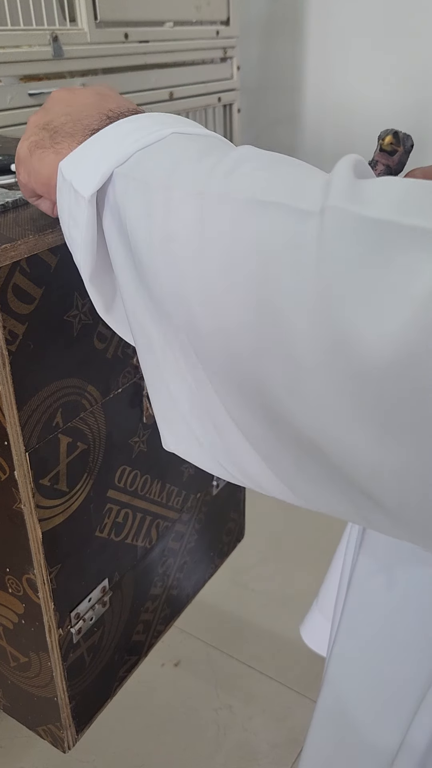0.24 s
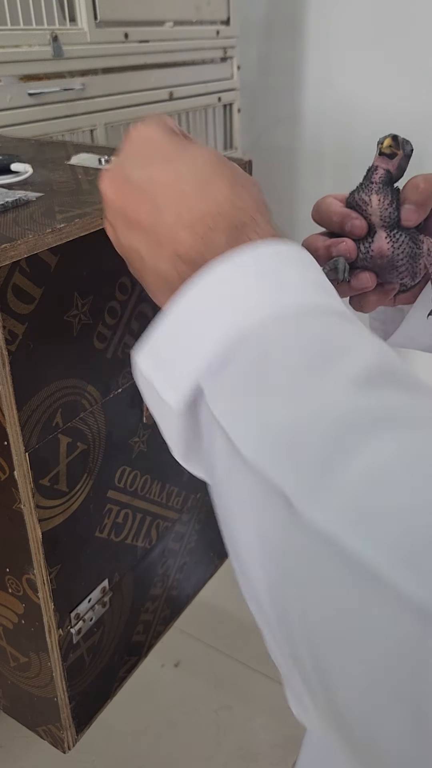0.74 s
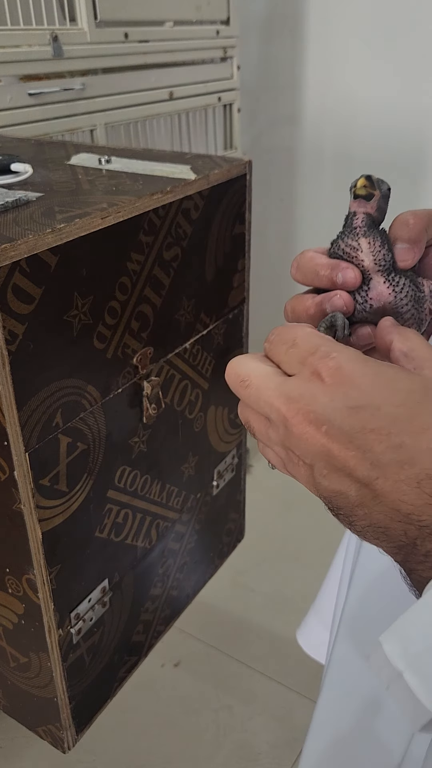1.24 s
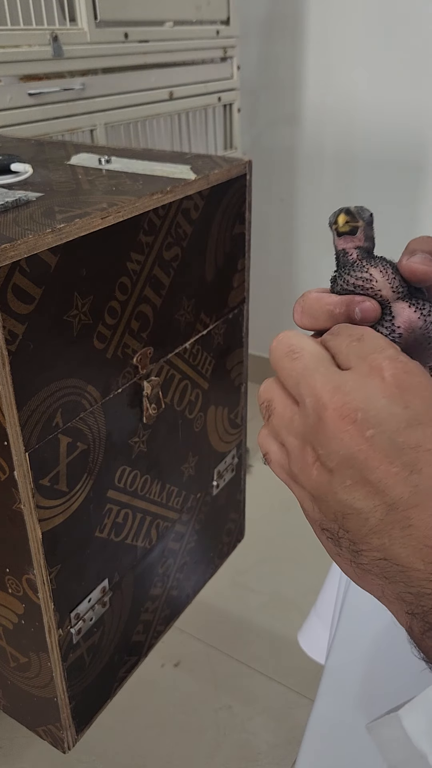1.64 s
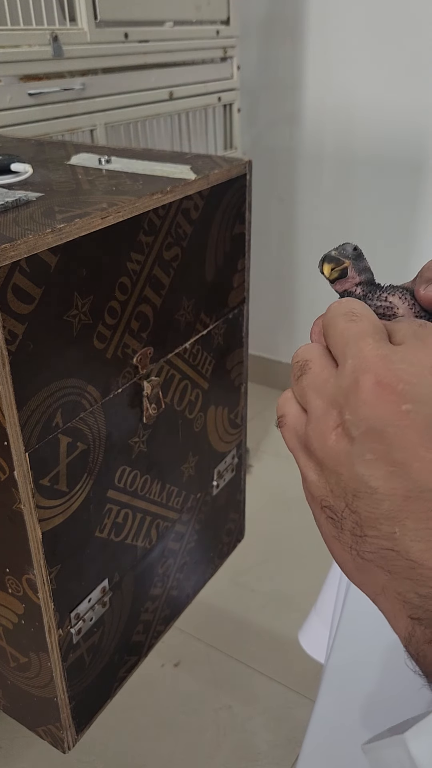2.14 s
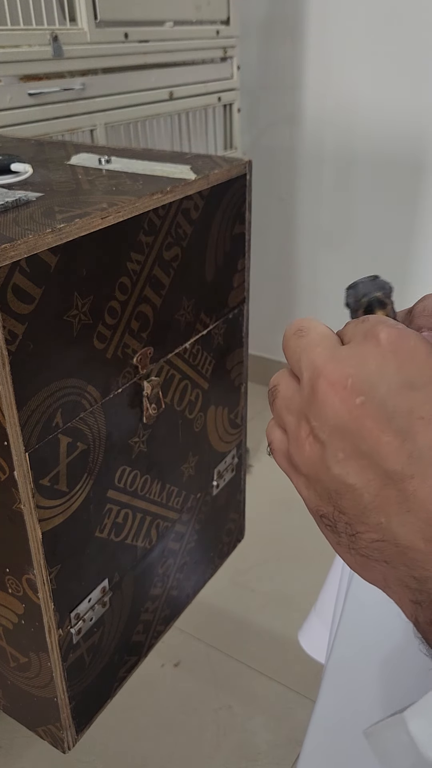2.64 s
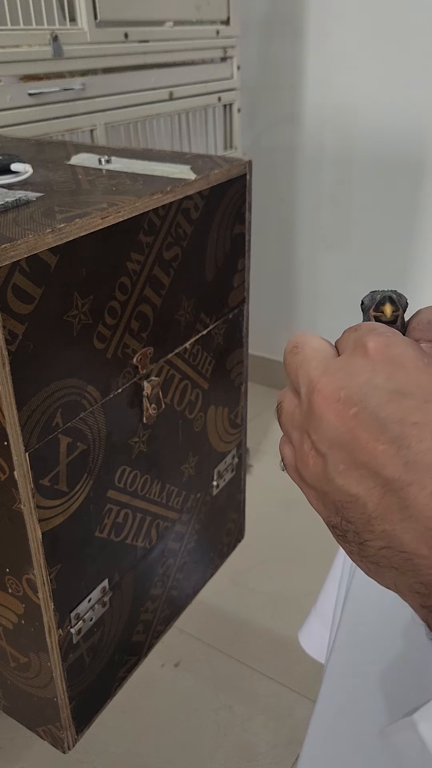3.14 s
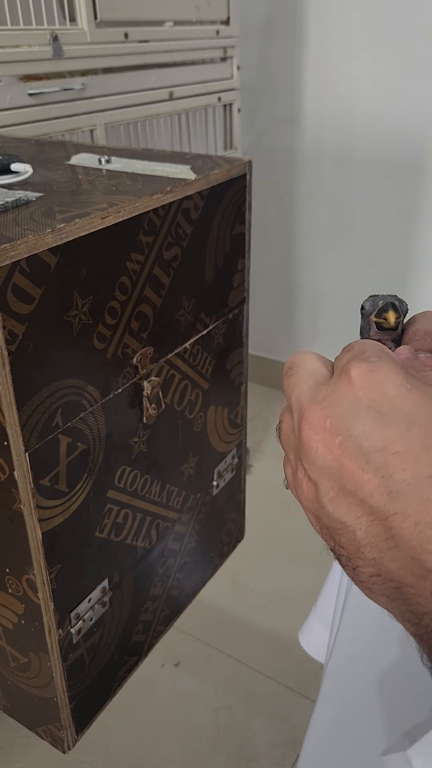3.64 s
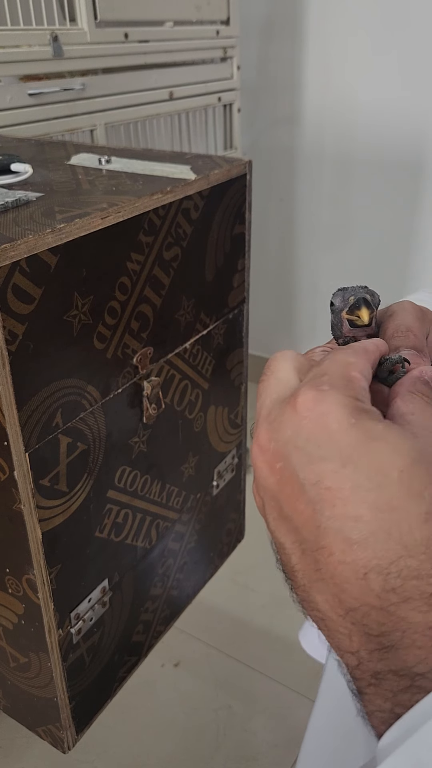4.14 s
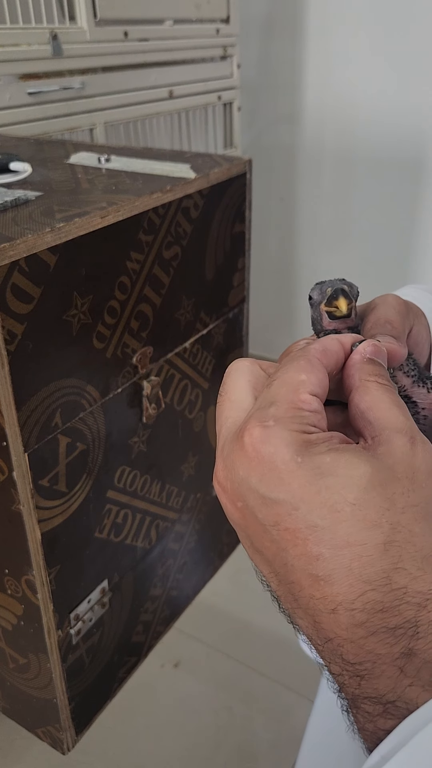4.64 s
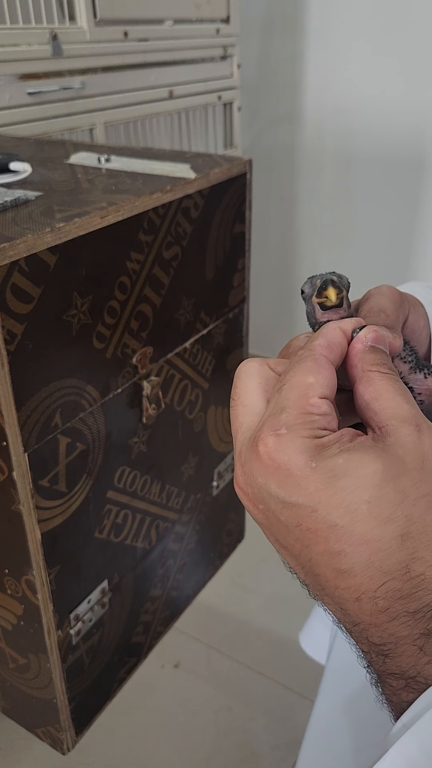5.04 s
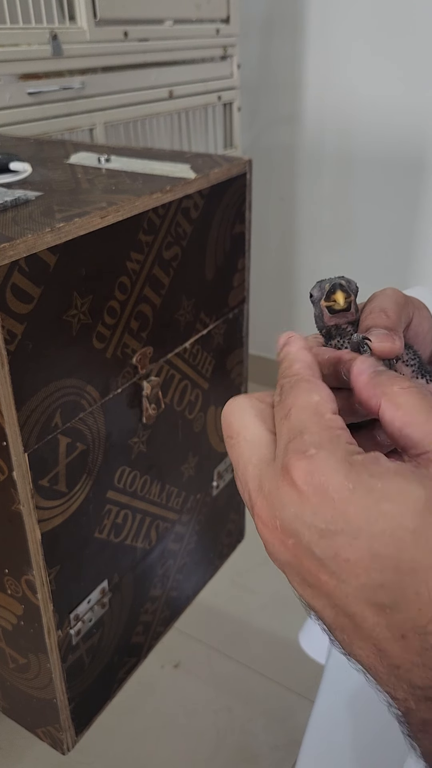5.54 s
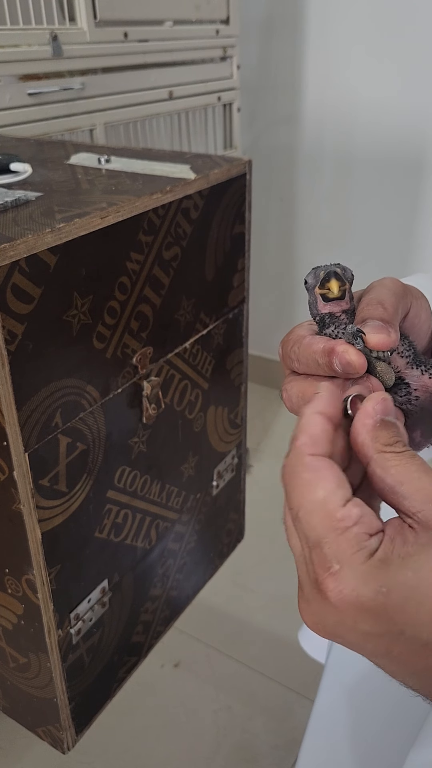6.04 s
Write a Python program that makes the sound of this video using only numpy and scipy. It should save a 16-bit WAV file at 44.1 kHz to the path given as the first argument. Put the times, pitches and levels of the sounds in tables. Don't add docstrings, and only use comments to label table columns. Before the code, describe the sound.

Two young parrots beg indoors: first come three long or short harsh double-pitched screams after one already under way, each splashing off hard walls. The reverberation dies into steady fan noise and bassy hum with faint rustles and ticks near the microphone. Next, shrill cries repeat about twice a second, blended with a purer high whistle, slightly left, bright and strongly reverberant.

```python
import sys
import numpy as np
from scipy import signal
from scipy.fft import rfft, irfft
from scipy.io import wavfile
from scipy.ndimage import uniform_filter1d, minimum_filter1d

SR = 44100
rng = np.random.default_rng(int(sys.argv[2]) if len(sys.argv) > 2 else 0)


def dump_mix(stems):
    frames = np.atleast_2d(stems).T
    limited = np.clip(frames, -1, 1)
    pcm = np.round(limited * 32767).astype(np.int16)
    wavfile.write(sys.argv[1], SR, pcm)


def elevation(decibels):
    levels = np.asarray(decibels, float)
    return 10 ** (levels / 20)


N = 277830
PAD = SR // 2
T = np.arange(-PAD, N) / SR
M = len(T)
LEAD_SAMPLES = 11
SCREAM_PERCENT = 2.4
BREAK_S = 0.07


def colour(x, points):
    hz = np.maximum(np.fft.rfftfreq(x.shape[-1], 1 / SR), 1)
    f, db = np.transpose(points)
    gain = elevation(np.interp(np.log(hz), np.log(f), db))
    return irfft(rfft(x) * gain, x.shape[-1])


def unit(x):
    return x / np.sqrt(np.mean(x ** 2))


def wander(rate_hz):
    k = max(int(SR / rate_hz), 1)
    smooth = uniform_filter1d(rng.standard_normal(M), k)
    return unit(uniform_filter1d(smooth, k))


def lifts(rows):
    return sum(lift_db * np.exp(-((T - s) / length_s) ** 2) for s, lift_db, length_s in rows)


def draught(points, db):
    # f/Hz, level/dB
    side_colour = [(60, -23), (110, -12.5), (200, -17.5), (380, -5), (700, -3), (1290, 3), (2380, 0),
                   (4400, 0), (8120, 2.5), (15000, -8)]
    mid, side = colour(rng.standard_normal((2, M)), points)
    side = np.array([[1], [-1]]) * colour(side, side_colour)
    return elevation(db) * (mid + side) / np.sqrt(np.mean(mid ** 2))


def cooler(birds):
    # f/Hz, level/dB (per Hz)
    air_colour = [(150, -39), (260, -4), (393, 0.5), (451, -6.5), (475, -2.5), (595, -6), (770, -1.5),
                  (931, -9), (1620, -17.5), (1760, -13), (2530, -21), (16000, -48)]
    # f/Hz, level/dB (per Hz)
    drone_colour = [(15, -42), (25, -7), (54, -4), (75, -5), (140, -2), (166, -7), (194, -0.5), (260, -4),
                    (340, -20.5), (570, -120)]
    # f/Hz, level/dB
    motor_lines = [(98, -51.5), (147, -49.5), (198, -51.5), (488, -55)]
    # t/s, lift/dB, length/s
    gusts = [
        (3.35, 10, 0.5),
        (4.2, -19, 0.16),
        (6.1, 11, 0.14),
    ]
    loud_db, recover_db_s = -26, 4.5
    loud = uniform_filter1d(birds ** 2, size=2000) > elevation(loud_db) ** 2
    last_loud = np.maximum.accumulate(np.where(loud, T, T[0]))
    quiet_s = uniform_filter1d(T - last_loud, size=3000)

    air_db = -47 + recover_db_s * quiet_s + np.array([[1.3], [-1.3]]) + 0.5 * wander(3.1)
    air = draught(air_colour, 0.81) * elevation(air_db)
    drone = draught(drone_colour, -43.5) * elevation(np.array([[0.7], [-0.7]]) + 0.8 * wander(3.2))
    lines = 0
    for hz, db in motor_lines:
        level = elevation(db + 0.8 * wander(16))
        lines = lines + level * np.sin(2 * np.pi * np.cumsum(hz + 0.28 * wander(3.3)) / SR)
    rumble_level = elevation(-49.5 + lifts(gusts) + 0.5 * wander(5.2))
    rumble = rumble_level * np.sin(2 * np.pi * np.cumsum(49 + 1.71 * wander(9.1)) / SR)
    return air + drone + np.sqrt(2) * lines + rumble


def calls(rows, rise_s=0.0045, fall_s=0.013):
    rows = np.array(rows, float)
    current = np.maximum(np.searchsorted(rows[:, 0], T) - 1, 0)
    start, length, db, change_db, *rest = rows[current].T
    age = np.maximum(T - start, 0)
    left = length - age
    gate = np.clip(age / rise_s, 0, 1) * np.clip(left / fall_s, 0, 1)
    return age, left, gate * elevation(db + change_db * np.minimum(age / length, 1)), *rest


def unsteady(age, left, percent):
    clean_percent, break_percent, settle_s = 0.35, 4, 0.04
    clean_s = np.where(percent > SCREAM_PERCENT, -0.015, 0.06)
    settled = np.clip((age - clean_s) / settle_s, 0, 1)
    broken = settled * np.clip(1 - left / BREAK_S, 0, 1)
    own = settled * (percent - clean_percent)
    return clean_percent + own + broken * np.maximum(break_percent - percent, 0)


def voice(hz, percent, partials_db, shimmer_db, wander_hz):
    phase = 2 * np.pi * np.cumsum(hz * (1 + percent / 100 * wander(wander_hz))) / SR
    shimmer = shimmer_db * np.sqrt(percent) * wander(wander_hz)
    swing = elevation(shimmer - 0.16 * shimmer_db ** 2 * percent)
    partials = sum(elevation(db) * np.sin((k + 1) * phase) for k, db in enumerate(partials_db))
    return np.sqrt(2) * swing * partials


def onset_lift(age, percent):
    return elevation(3 * np.exp(-age / 0.053) * (percent > SCREAM_PERCENT))


def chick():
    # t/s, length/s, level/dB, change over the call/dB, second harmonic f/Hz
    low_calls = [
        (-.35, 0.43, -26.5, 6, 5065),
        (.536, .43, -17, -5, 5225),
        (1.412, 0.4705, -18.5, -3, 5430),
        (2.11, 0.225, -12, -12, 5367),
        (3.965, 0.29, -16.5, -8.5, 4980),
        (4.52, 0.31, -16.5, -12.5, 5040),
        (5.11, 0.28, -13.5, -10, 5080),
        (5.705, 0.32, -12, -17.5, 5130),
    ]
    # unsteadiness/%, glide/(Hz/s)
    low_manner = [(2.5, 0), (2.7, 400), (2.9, -420), (3.1, -1000), (1.5, 300), (1.9, 450), (2, 250),
                  (1.8, 50)]
    low_first_db = [-20, 3, 8, -14, 16, 10, 9, 7]
    # t/s, length/s, level/dB, change/dB, f/Hz
    high_calls = [(-.35, 0.32, -18, -11, 3930), (.562, 0.388, -19.5, -2, 3740),
                  (1.403, 0.51, -22, -5.5, 3760), (2.078, 0.27, -20, -20.5, 3720),
                  (4.015, 0.025, -16, -15, 3714), (4.11, 0.33, -23, -12, 3780),
                  (4.69, 0.24, -22, -7.5, 3700), (5.17, 0.1357, -31, -10, 3650),
                  (5.29, 0.18, -24.5, -9, 3730), (5.765, 0.084, -19, -39, 3650),
                  (5.92, 0.26, -19.5, -23, 3730)]
    high_unsteady = [5, 3.8, 4, 6, .8, 1, .7, 1.3, .5, 1.4, .45]
    high_second_db = [-40, -15, -7.5, -8.5, -8, -5, -8.5, -6, -4, -5.5, -6.5]

    low_rows = np.column_stack([low_calls, low_manner, low_first_db])
    age, left, gain, hz, percent, glide, first_db = calls(low_rows)
    first_db = np.maximum(first_db - 330 * age, -25)
    swell_s = np.where(percent > SCREAM_PERCENT, 0.012, 0.05)
    gain = gain * elevation(-20 * np.exp(-age / swell_s)) * onset_lift(age, percent)
    pitch = (hz + glide * np.minimum(age, 0.5)) / 2
    partials_db = [first_db, 0, -14.5, -18, -34, -36]
    low = gain * voice(pitch, unsteady(age, left, percent), partials_db, shimmer_db=6, wander_hz=454.6)

    high_rows = np.column_stack([high_calls, high_unsteady, high_second_db])
    age, left, gain, hz, percent, second_db = calls(high_rows)
    rough = unsteady(age, left + BREAK_S / 2, percent)
    pitch = hz - 150 * np.exp(-age / 0.03)
    partials_db = [0, second_db, -28, -32]
    high = voice(pitch, rough, partials_db, shimmer_db=-1.5, wander_hz=443.5)
    return low + gain * onset_lift(age, percent) * high


def rasp():
    # t/s, length/s, level/dB, change/dB, croak at onset re level/dB
    sudden = [
        (-.2, 0.13, -40, 10.5, -10),
        (.511, 0.48, -34.5, -14, 12.5),
        (1.38, 0.56, -34.5, -13, 15),
        (2.066, 0.33, -33.5, -11, 11),
        (3.894, 0.048, -28, -11, 18),
        (3.95, 2.2, -51.5, -5.5, 3),
    ]
    # t/s, length/s, level/dB, change/dB, croak re level/dB
    breaks = [
        (4.2, 0.33, -32, -21.5, 18.5),
        (4.47, 0.24, -45, -9, 17),
        (4.79, 0.095, -34, -1, 11),
        (5.02, 0.082, -39, 1, 24.5),
        (5.38, .14, -44.5, 1, 18.5),
        (5.61, 0.073, -41.5, -2.5, 28),
        (5.82, 0.061, -50.5, -5, 34),
        (6.0, 0.18, -43, -8, 22),
    ]
    # f/Hz, level/dB (per Hz)
    throat = [(1300, -24), (2000, 6.5), (2900, -2.5), (3700, 20), (4500, 7.5), (5200, 15), (6600, 8.5),
              (7900, 5), (9400, -2), (10500, -7), (12500, -8), (15500, -19)]
    croak_colour = [(700, -46), (1300, -14), (1700, 0.5), (2100, 2), (2500, 0), (3500, -34)]
    slaps = rng.standard_normal((2, M)) * elevation(5.96 * wander(910))
    hiss = unit(colour(slaps[0], [(600, -54)] + throat))
    croak = unit(colour(slaps[1], croak_colour))
    sudden_calls = calls(sudden, rise_s=0.0053, fall_s=0.022)
    break_calls = calls(breaks, rise_s=0.029, fall_s=0.054)
    out = 0
    for age, _, gain, croak_db in (sudden_calls, break_calls):
        croak_db = np.maximum(croak_db - 150 * age, -7)
        hiss_db = 15 - 22 * np.exp(-age / 0.028)
        out = out + gain * (elevation(hiss_db) * hiss + elevation(croak_db - 13) * croak)
    return out


def sleeve():
    # t/s, length/s, level/dB, change/dB
    rubs = [
        (2.73, .22, -41.5, -30),
        (4.51, 0.068, -31, -15.5),
        (4.67, 0.13, -36.5, -28),
        (4.96, 0.059, -41, -8),
    ]
    cloth_colour = [(700, -23), (1150, -2), (1600, -6), (2800, -9), (8000, -30), (10000, -53)]
    rub = unit(colour(rng.standard_normal(M), cloth_colour))
    gain = calls(rubs, rise_s=0.01, fall_s=0.042)[2]
    return rub * gain * elevation(5.7 * wander(45))


def fingers():
    # t/s, peak level/dB, decay/s, brightness/dB
    ticks = [
        (2.7444, -46, 0.011, 9),
        (3.289, -58.5, 0.005, 20),
        (3.3905, -51, 0.0041, 28),
        (3.6205, -53, 0.0077, 25),
        (3.6994, -47, 0.0059, -1),
        (3.7263, -45, 0.0051, -2),
        (3.766, -43, 0.0046, 0),
        (3.8474, -41, 0.028, -22),
    ]
    out, t = np.zeros((2, M)), np.arange(SR // 10) / SR
    noises = rng.standard_normal((len(ticks), len(t)))
    for (s, db, decay_s, bright_db), noise in zip(ticks, noises):
        i = int(s * SR) + PAD
        levels = elevation([[db + 12.0], [db - 2.5 + bright_db]])
        out[:, i:i + len(t)] += levels * noise * np.exp(-t / max(decay_s, 0.001))
    dull = colour(out[0], [(2500, -5), (4800, -7), (6500, -11), (11000, -48)])
    bright = colour(out[1], [(5000, -27), (9000, -20), (15000, -27)])
    return dull + bright


def sibling():
    # t/s, length/s, level/dB, change/dB, second harmonic re level/dB
    whistles = [
        (3.914, .09, -10, -21.5, -11),
        (4.25, 0.2, -25, 8, -14),
        (4.44, 0.14, -22, -10.5, -9),
        (4.69, 0.12, -31.5, 10, -19),
        (4.955, 0.26, -21.5, -6.5, -11.5),
        (5.24, 0.15, -28, 9.5, -20),
        (5.62, 0.2, -13, -16.5, -10.5),
        (5.97, .12, -28.5, 10, -13.5),
        (6.09, 0.14, -17, -23.5, -18.5),
        (6.21, 0.19, -35.5, 11, -8),
    ]
    # t/s, length/s, level/dB, change/dB, f/Hz
    half_pitch = [
        (3.895, .035, -32, -2, 1640),
    ]
    # t/s, f/Hz
    pitch_track = [(3.92, 2950), (4.0, 2900), (4.25, 2660), (4.42, 2950), (4.55, 3010), (4.7, 2950),
                   (4.96, 2990), (5.03, 3075), (5.17, 3000), (5.39, 3085), (5.45, 3040), (5.62, 2975),
                   (5.72, 3095), (5.83, 3060), (6.05, 3115), (6.3, 3000)]
    # t/s, lift/dB, length/s
    swells = [
        (4.393, 12, 0.01),
        (5.065, 24, 0.0031),
        (5.078, 14, 0.0056),
        (5.094, 8, 0.0034),
        (5.123, -11, 0.0022),
        (5.146, 11, 0.0045),
        (5.388, 15, 0.0016),
        (5.678, 1.5, 0.0065),
        (6.09, 32, 0.0048),
        (6.284, 0, .005),
    ]
    _, _, gain, second_db = calls(whistles, rise_s=0.0062)
    pitch = np.interp(T, *np.transpose(pitch_track))
    partials_db = [0, second_db, -24, -34, -40]
    whistle = voice(pitch, 0.75, partials_db, shimmer_db=7.0, wander_hz=138.0)
    whistle = gain * elevation(lifts(swells)) * whistle
    _, _, gain, hz = calls(half_pitch, fall_s=0.012)
    onset = voice(hz, 1.615, [2.5, 6.5, 3.5, -6, -19], shimmer_db=5.5, wander_hz=307)
    return whistle + gain * onset


def room(x):
    # f/Hz, T60/s
    decay_times = [(1500, 2.5), (3000, 1.72), (5000, 1.14), (8000, 0.71), (12000, 0.16)]
    wet_db, early_db, early_s, level_difference_db = 5.5, 3.5, 0.077, 3.5
    t = np.arange(int(1.5 * SR)) / SR
    tail = 0
    for k, (_, t60) in enumerate(decay_times):
        shape = [(f, 0 if j == k else -40) for j, (f, _) in enumerate(decay_times)]
        band = colour(rng.standard_normal((2, len(t))), shape) * np.exp(-np.log(1000) * t / t60)
        tail = tail + band / np.sqrt(t60)
    tail = tail * np.clip(t / 0.0013, 0, 1) / np.sqrt(np.sum(tail ** 2) / 2)
    early = rng.standard_normal((2, len(t))) * np.exp(-t / early_s) * (t > 0.003)
    early = early / np.sqrt(np.sum(early ** 2) / 2)
    response = elevation(wet_db) * tail + elevation(early_db) * early
    response[0, 0] += 1
    response[1, LEAD_SAMPLES] += elevation(-6.5)
    response *= elevation(np.array([[level_difference_db], [-level_difference_db]]) / 2 + 0.5)
    return signal.fftconvolve(x[None], response, axes=1)[:, :M]


def scene():
    ticks, whistle = fingers(), sibling()
    birds = chick() + whistle + rasp()
    near = np.array([ticks, elevation(-3) * np.roll(ticks, 9)])
    straight = np.array([whistle, elevation(-3.5) * np.roll(whistle, LEAD_SAMPLES)])
    near += elevation(-1.5) * straight
    echoing = room(birds + sleeve() + elevation(-6) * ticks)
    return (echoing + near + cooler(birds))[:, PAD:]


def band_limit(x):
    return signal.sosfilt(signal.butter(12, 16000, fs=SR, output="sos"), x)


def record(dry):
    bass_cut = signal.butter(2, 36, "high", fs=SR, output="sos")
    top_cut = signal.ellip(10, 0.2, 70, 15750, fs=SR, output="sos")
    heard = signal.sosfilt(bass_cut, dry)
    heard = signal.sosfilt(top_cut, heard)
    peak = np.abs(heard).max(axis=0) + 1e-9
    limit = minimum_filter1d(np.minimum(0.93 / peak, 1), size=401)
    heard = heard * uniform_filter1d(uniform_filter1d(limit, size=200), size=200)
    return band_limit(heard)


dry = scene()
out = record(dry)
dump_mix(out)
```